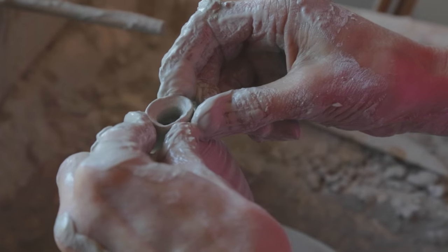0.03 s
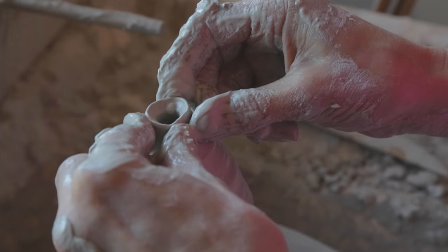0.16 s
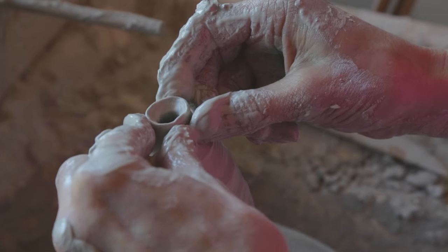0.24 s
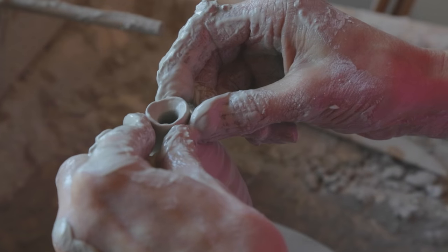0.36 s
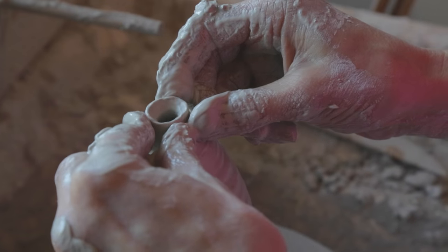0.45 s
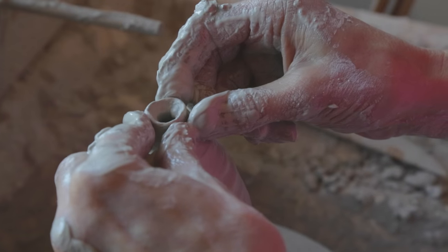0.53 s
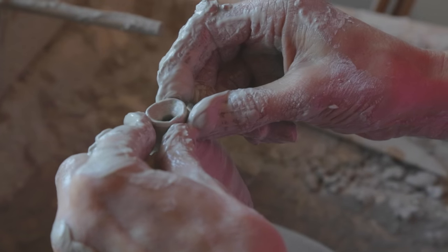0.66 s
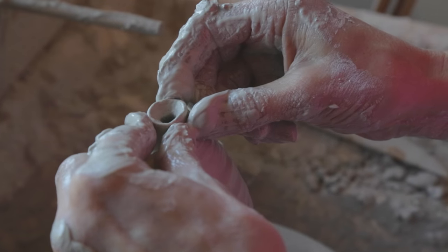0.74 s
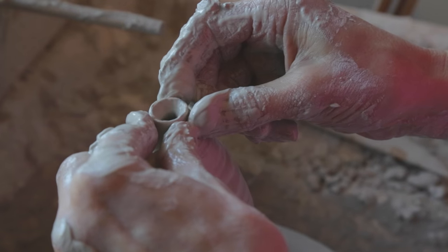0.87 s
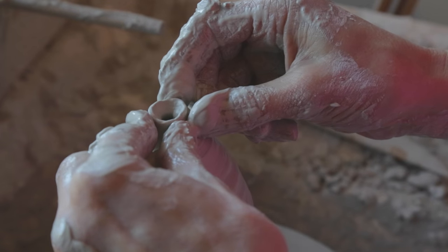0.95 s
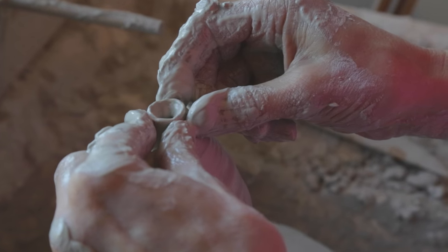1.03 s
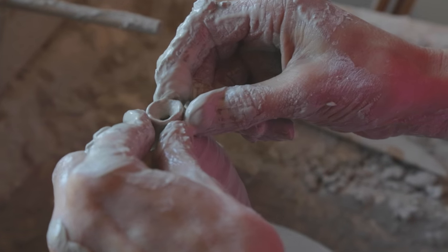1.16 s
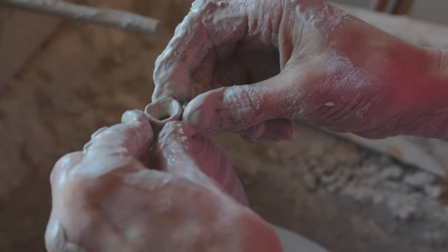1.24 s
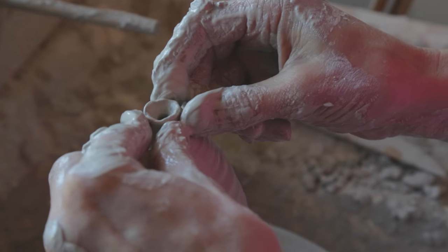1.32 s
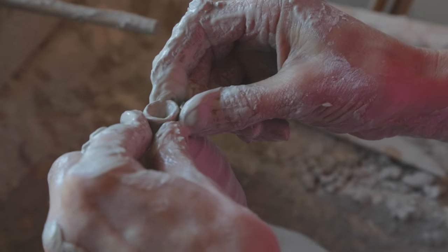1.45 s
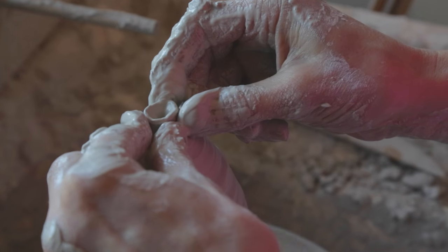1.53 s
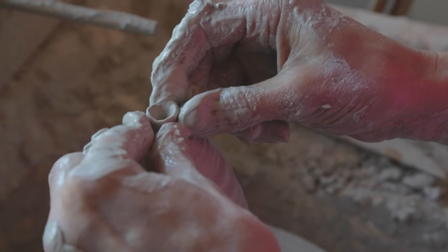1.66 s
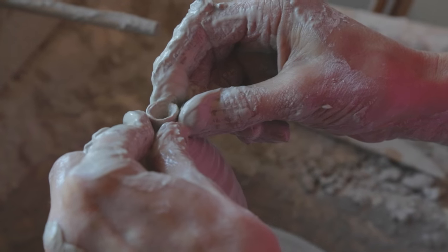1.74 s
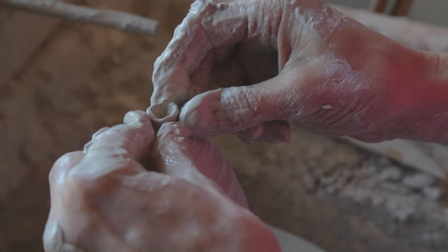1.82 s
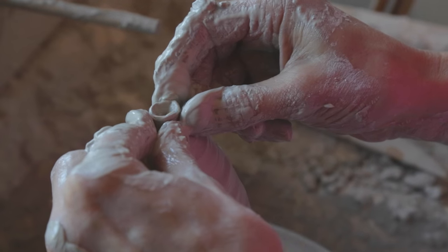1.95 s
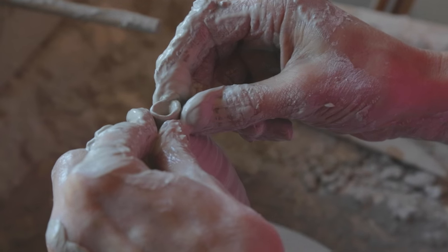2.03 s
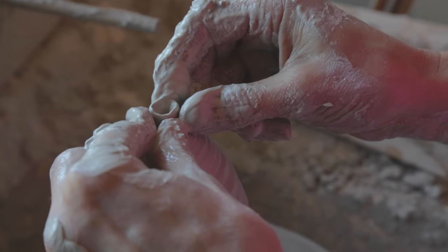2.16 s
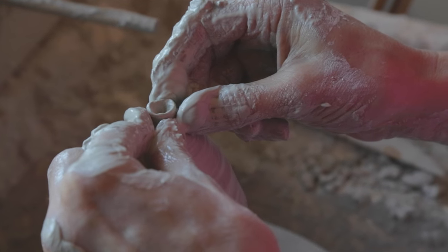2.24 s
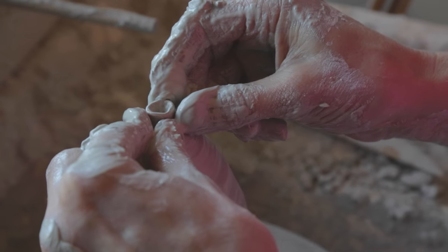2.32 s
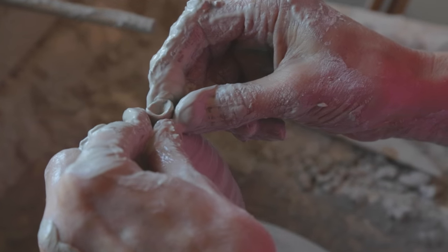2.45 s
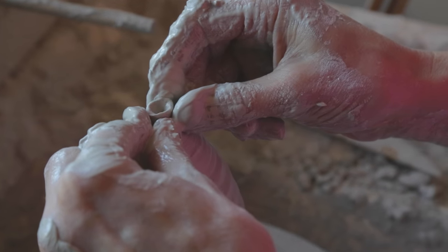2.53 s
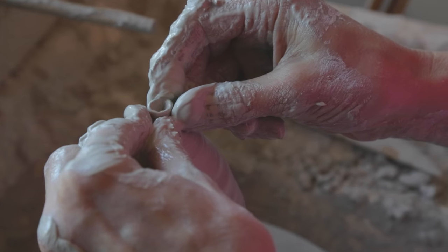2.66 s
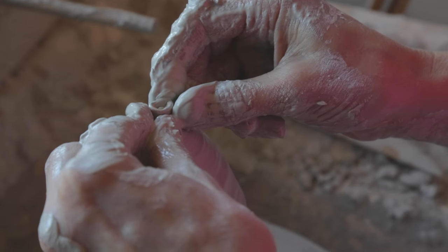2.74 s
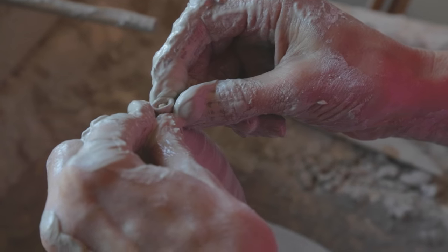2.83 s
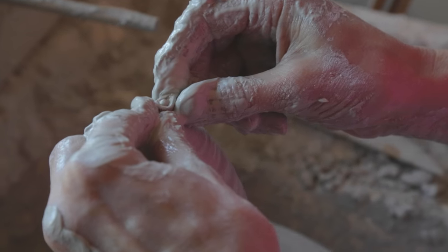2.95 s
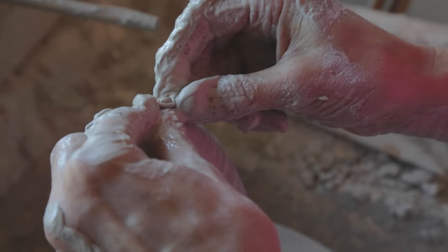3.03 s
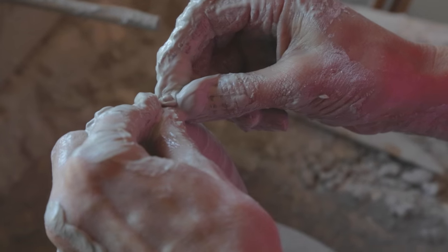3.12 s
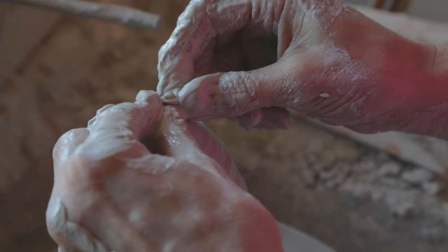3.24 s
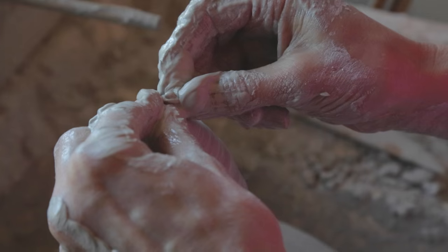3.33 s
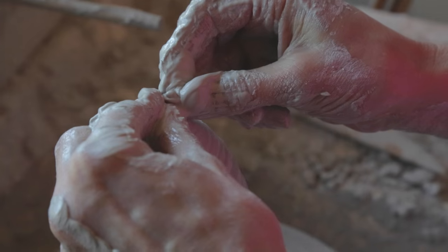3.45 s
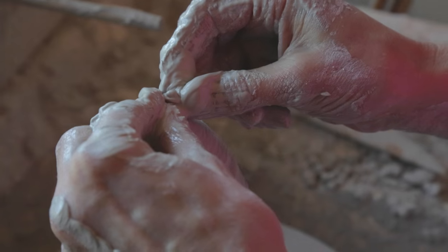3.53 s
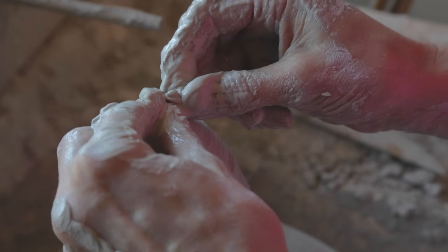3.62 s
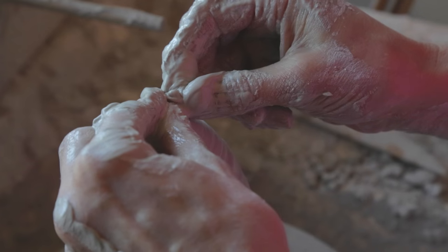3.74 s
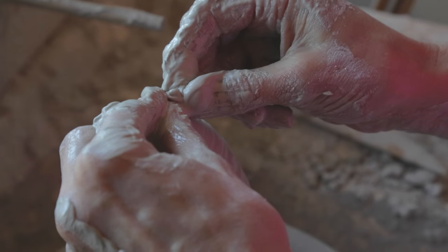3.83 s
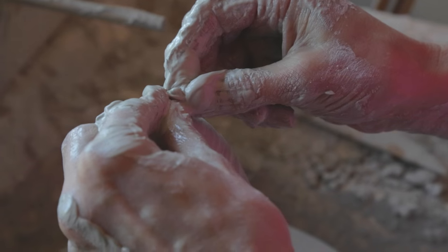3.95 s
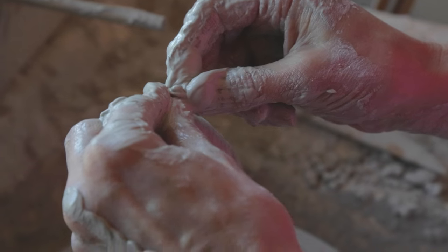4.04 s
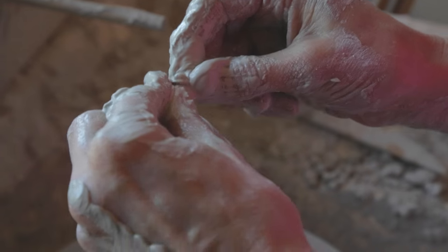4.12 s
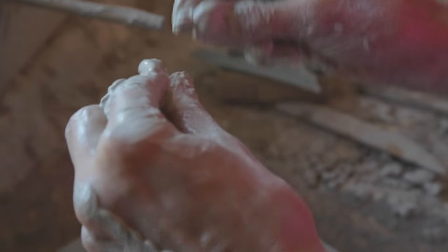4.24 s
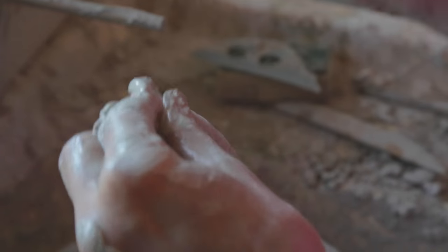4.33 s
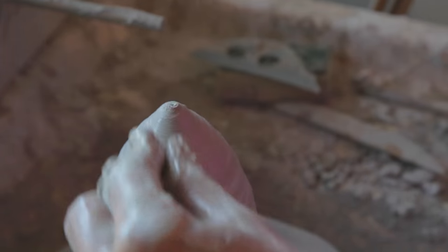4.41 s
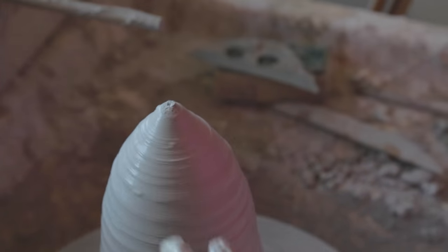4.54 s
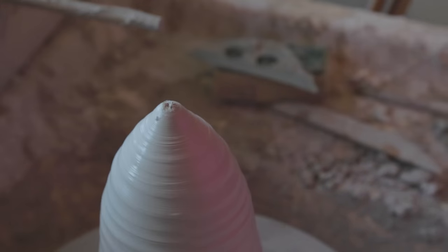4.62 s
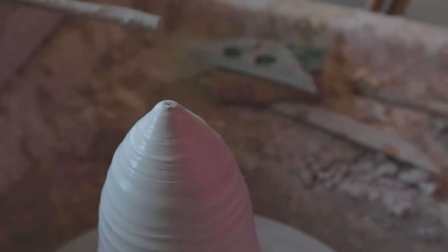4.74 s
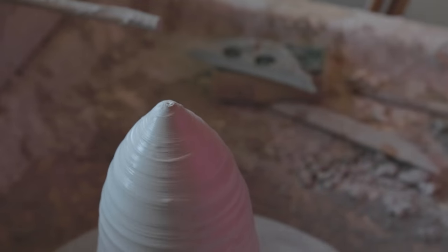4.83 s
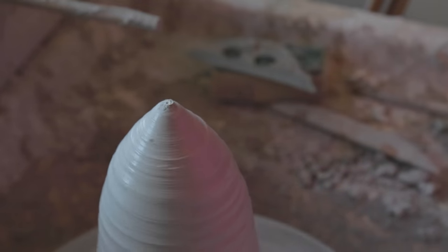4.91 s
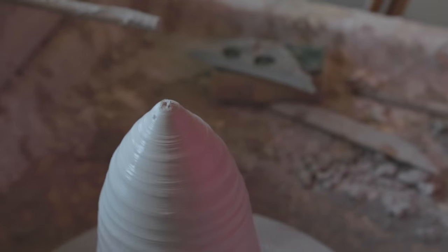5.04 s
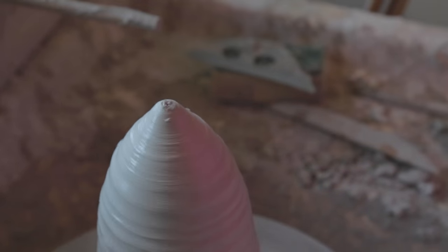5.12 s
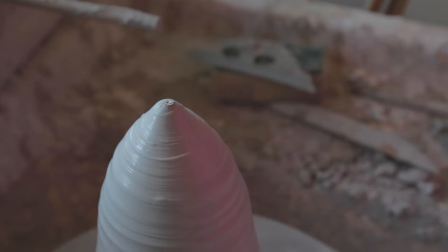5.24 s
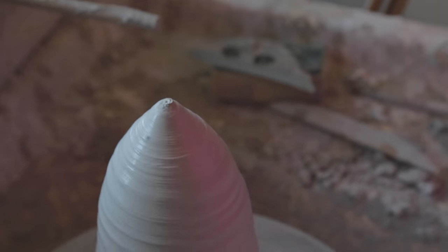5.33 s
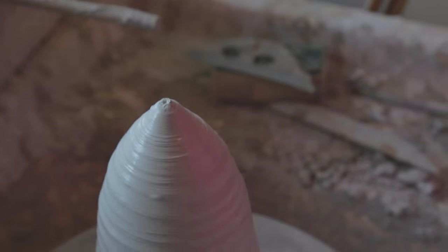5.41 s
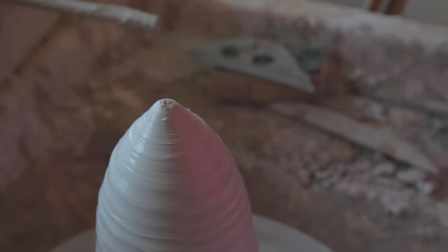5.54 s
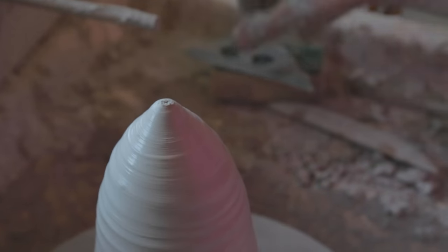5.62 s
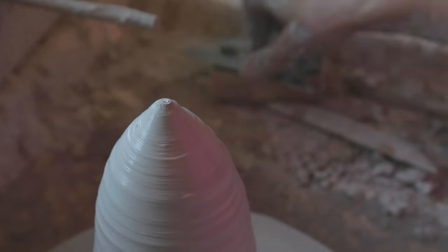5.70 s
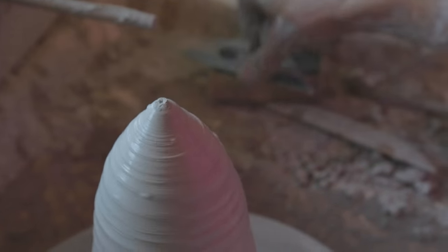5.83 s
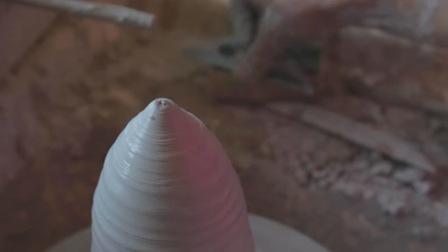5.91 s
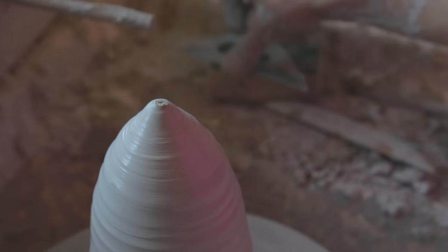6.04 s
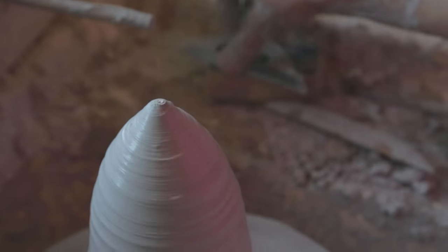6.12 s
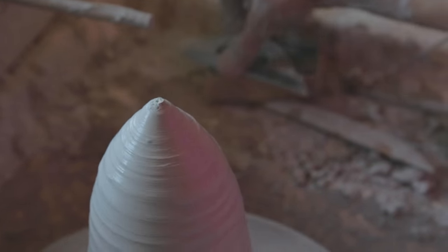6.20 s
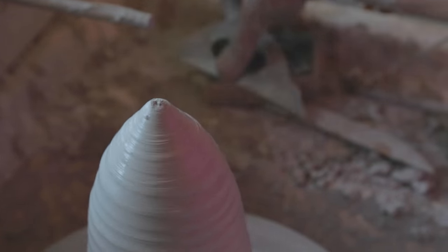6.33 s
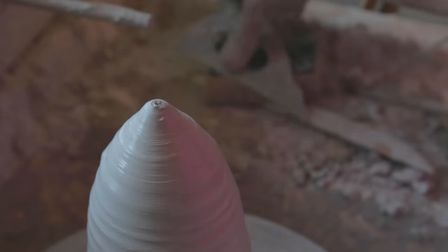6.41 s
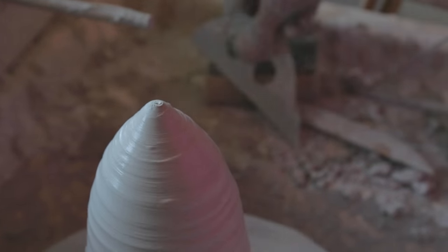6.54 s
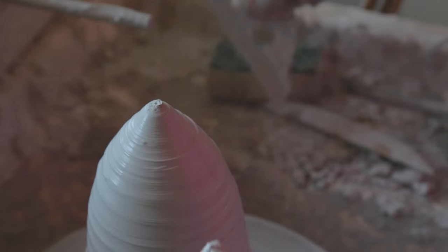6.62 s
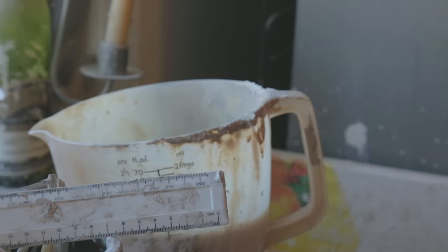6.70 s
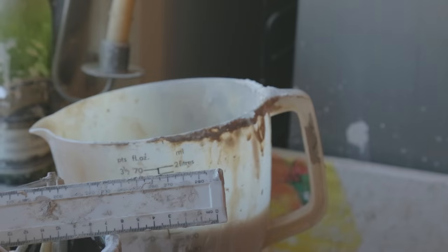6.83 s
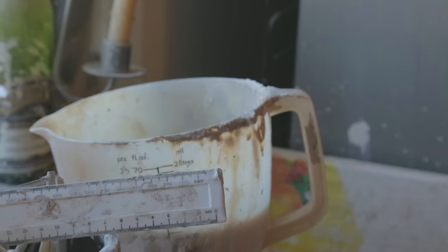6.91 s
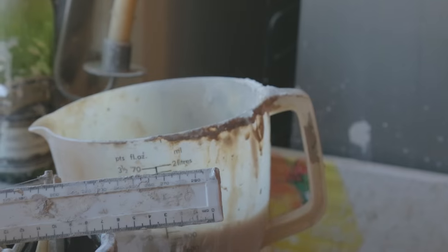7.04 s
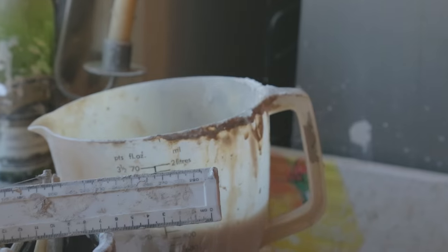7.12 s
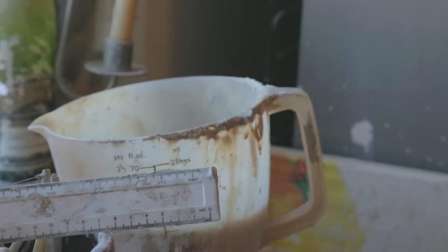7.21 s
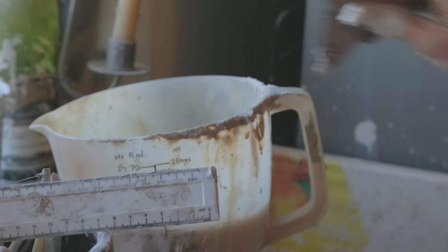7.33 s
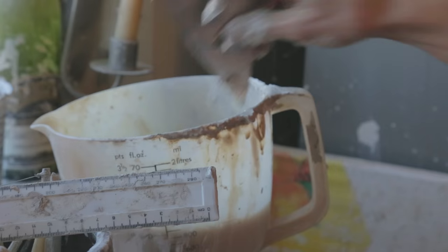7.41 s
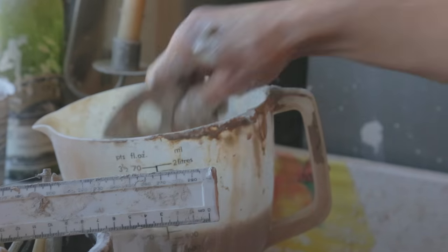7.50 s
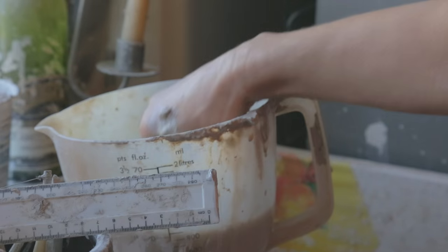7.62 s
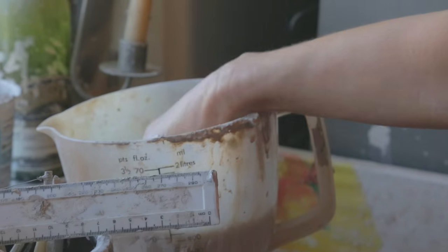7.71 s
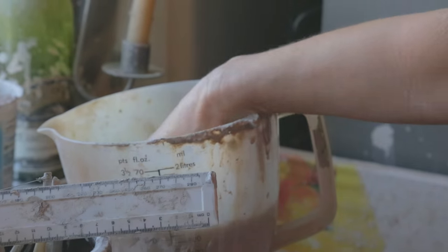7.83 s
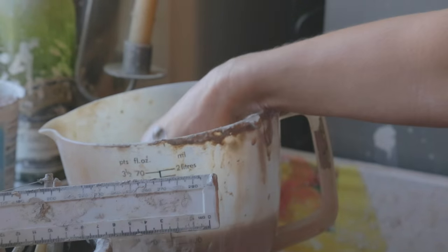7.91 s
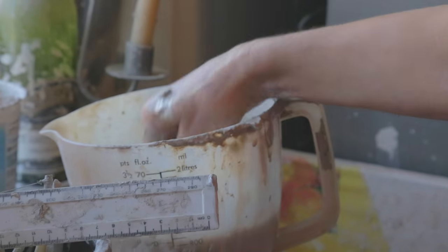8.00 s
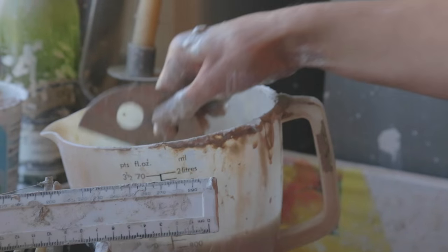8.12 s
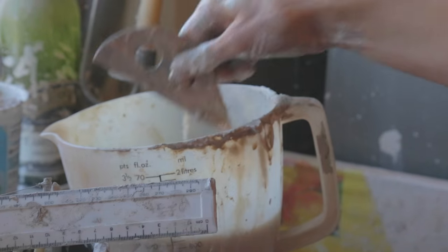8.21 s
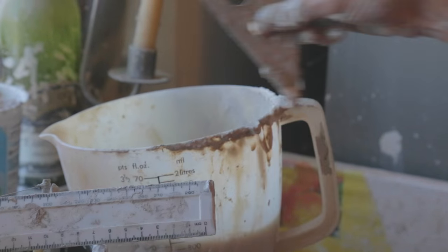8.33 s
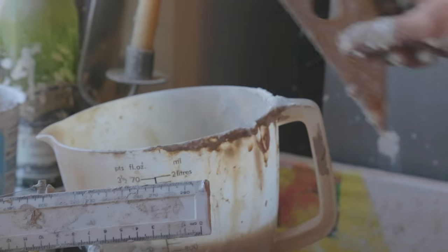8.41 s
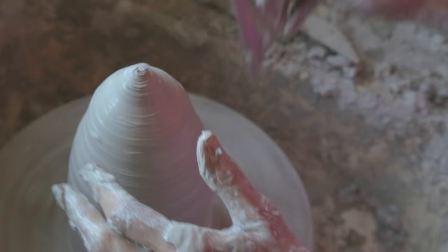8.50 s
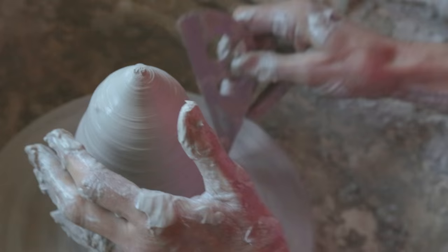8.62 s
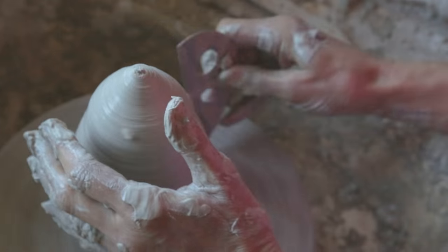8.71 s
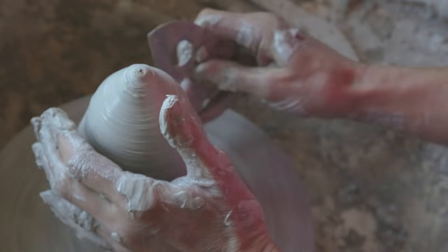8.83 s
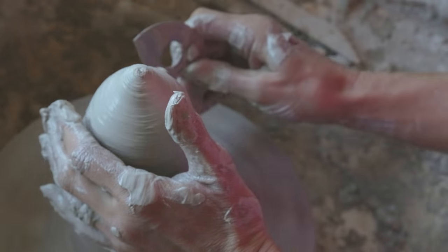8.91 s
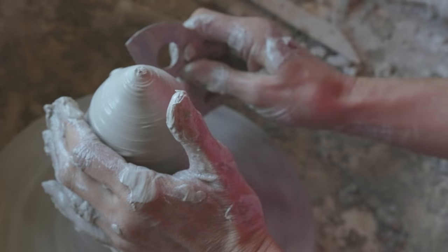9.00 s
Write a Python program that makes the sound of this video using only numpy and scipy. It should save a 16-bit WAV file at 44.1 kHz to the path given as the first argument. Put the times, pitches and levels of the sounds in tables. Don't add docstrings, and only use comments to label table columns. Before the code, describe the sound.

Low, uneven motor rumble and soft wet clay hiss continue throughout while a metal rib is picked up, dipped in a plastic jug and shaken.

```python
import sys
import numpy as np
from scipy import signal
from scipy.io import wavfile

SR = 44100
rng = np.random.default_rng(int(sys.argv[2]) if len(sys.argv) > 2 else 0)


def bounce(signal):
    frames = np.transpose(np.atleast_2d(signal))
    limited = np.clip(frames, -1, 1)
    pcm = np.round(limited * 32767).astype(np.int16)
    wavfile.write(sys.argv[1], SR, pcm)


def nominal_scale(level):
    x = np.asarray(level, float) / 20
    return 10 ** x


N = 399546
SLOW = 40


def rms_one(x):
    return x / np.sqrt(np.mean(x ** 2) + 1e-20)


def peak_one(x):
    return x / np.abs(x).max()


def drift(rate):
    r = np.exp(-2 * np.pi * rate * SLOW / SR)
    settle = 2000
    white = rng.standard_normal(N // SLOW + settle + 2)
    return rms_one(signal.lfilter([1], [1, -2 * r, r * r], white)[settle:])


def spread(slow):
    return np.interp(np.arange(N) / SLOW, np.arange(len(slow)), slow)


def curve(rows):
    return np.interp(np.arange(N) / SR, *np.transpose(rows))


def humps(rows, width_s):
    t = np.arange(N // SLOW + 1) * SLOW / SR
    return spread(sum(db * np.exp(-.5 * ((t - s) / width_s) ** 2) for s, db in rows))


def wobble(rows, turn_hz):
    mark_s, change_s = 3.3, 6.7
    t = np.arange(N) / SR
    swing_db = sum(db * np.cos(2 * np.pi * (k * turn_hz * (t - mark_s) + lead)) for k, db, lead in rows)
    return swing_db * np.where(t < change_s, 1, .3)


def resonate(x, hz, width_hz):
    r = np.exp(-np.pi * width_hz / SR)
    zeros = np.array([1, 0, -1]) * (1 - r * r) / 2
    return signal.lfilter(zeros, [1, -2 * r * np.cos(2 * np.pi * hz / SR), r * r], x)


def resonate_twice(x, hz, width_hz):
    return resonate(resonate(x, hz, width_hz), hz, width_hz)


def bandpass(x, low, high):
    return signal.sosfilt(signal.butter(2, [low, high], "band", fs=SR, output="sos"), x)


def banded_noise(spectrum, patchy_db, rate):
    hz, db = np.transpose(spectrum)
    edges = hz[0] * 2 ** np.arange(0, np.log2(hz[-1] / hz[0]) + .2, 1 / 3)
    white = rng.standard_normal((2, N))
    together = drift(rate)
    out = 0
    for k, (low, high) in enumerate(zip(edges, edges[1:])):
        band_db = np.interp(np.log(low * high) / 2, np.log(hz), db)
        flicker_db = patchy_db * (together + .7 * drift(rate))
        out = out + bandpass(white[k % 2], low, high) * spread(nominal_scale(band_db + flicker_db))
    return rms_one(out)


def nearby(x):
    t = np.arange(SR // 20) / SR
    echoes = rng.standard_normal(len(t)) * nominal_scale(-60 * t / 0.069) * (t > .003)
    echoes = echoes / np.sqrt(np.sum(echoes ** 2))
    return rms_one(x + 0.28 * signal.oaconvolve(x, echoes)[:N])


def add(out, s, sound):
    at = round(s * SR)
    out[at:at + len(sound)] += sound[:N - at]


def struck(modes, luck):
    touch_s = .0005
    t = np.arange(SR // 8) / SR
    rings = sum(nominal_scale(db + 2.2 * chance - 60 * t / t60) * np.sin(2 * np.pi * hz * t)
                for (hz, db, t60), chance in zip(modes, luck))
    return (1 - np.exp(-t / touch_s)) * rings


def rumble(level_db):
    # f/Hz, bandwidth/Hz, level/dB
    cabinet_modes = [(92, 28, -18.5), (122.5, 19, -7.5), (165.7, 18.1, -7.5), (223.3, 37.5, -6),
                     (253.6, 37, -1), (264.9, 20, 1), (303.6, 35, -6.5), (363.4, 46.6, -6),
                     (432.7, 59.4, -12), (495.6, 39.6, -11.5), (553, 35, -16), (677.3, 48, -17.5),
                     (797, 117, -23), (994, 65, -37)]
    # t/s, peak level/dB (not used), jump of the drive/dB
    belt_thumps = [(0.247, -5, 3), (0.345, -7, 2), (0.438, -6, -1), (0.637, -8, 6), (0.742, -9, 1.5),
                   (0.989, -4, 5.5), (1.055, -7, 5), (1.188, -9, 4), (1.316, -4, 5.5), (1.503, -7, 2),
                   (1.725, -10, 7), (1.844, -8, 2), (1.91, -6, 0.5), (2.317, -8, 4.5), (2.615, -7, 2),
                   (2.747, -9, -1), (2.842, -7, 6.5), (3.147, -8, 5.5), (3.498, -5, 3), (3.669, -6, 1.5),
                   (3.842, -5, 5.5), (3.993, -9, 0), (4.226, -6, 4), (4.326, -6, 1.5), (4.413, -8, 3),
                   (4.895, -7, -1), (5.297, -6, -3), (5.369, -6, 0.5), (5.535, -3, 2.5), (5.741, -9, -0.5),
                   (5.844, -6, 3.5), (6.08, -9, 5.5), (6.202, -6, 6), (6.402, -5, 6), (6.556, -7, 1),
                   (6.677, -8, 2), (6.774, -7, -0.5), (6.961, -9, 3), (7.039, -5, 3), (7.204, -8, 4.5),
                   (7.367, -7, 0), (7.46, -10, 4), (7.582, -9, 3), (7.726, -4, 5.5), (8.126, -7, 5),
                   (8.201, -6, 4.5), (8.417, -6, 1), (8.504, -8, 3), (8.736, -8, -2.5), (8.868, -5, 5.5)]
    # t/s, level/dB
    main_swells = [(.36, 4), (.85, -2), (1.34, 3), (2.0, 1), (2.6, -1), (3.3, -0.5), (3.9, -0.5),
                   (4.4, 0.5), (4.85, -2), (5.15, 2), (5.5, -1), (5.97, -2), (6.5, 1), (7.0, -0.5),
                   (7.35, -2), (7.68, 3.5), (8.1, 2), (8.5, 0), (8.9, 0)]
    # t/s, level/dB
    low_swells = [(.7, -2.5), (1.5, 0), (2.1, -4), (2.65, 0.5), (3.15, -4.5), (3.5, 2), (4.6, -2.5),
                  (5.7, 2.5), (6.55, 2.5), (6.8, 6), (7.75, -1.5), (8.3, -3), (8.9, -2.5)]
    # t/s, level/dB
    mid_swells = [(.6, -2), (1.5, 0), (2.2, 0.5), (3.0, 0.5), (3.6, 0.5), (4.26, -1.5), (4.85, -0.5),
                  (5.5, 0), (6.22, -2.5), (7.0, 0), (7.4, -1), (7.92, 4), (8.5, 0.5)]
    swell_s, thump_dies_s = .12, 0.011
    lead_in = SR // 4

    drive = rng.standard_normal((2, N + lead_in))
    drive *= nominal_scale(2.5 * rms_one(resonate(rng.standard_normal(N + lead_in), 35, 128)))
    jumps_db = np.zeros(N)
    for s, _, db in belt_thumps:
        add(jumps_db, s, db * np.exp(-np.arange(SR // 10) / SR / thump_dies_s))
    drive[:, -N:] *= nominal_scale(jumps_db)

    # swell/dB, centre f/Hz, reach/octaves
    swells = [(humps(main_swells, swell_s), 265, 0.13),
              (humps(low_swells, swell_s), 95, .5),
              (humps(mid_swells, swell_s), 427, .4)]
    body = 0
    for k, (hz, width, db) in enumerate(cabinet_modes):
        swell_db = sum(swell * np.exp(-(np.log2(hz / centre) / reach) ** 2) for swell, centre, reach in swells)
        mode = resonate_twice(drive[k % 2], hz, 1.364 * width)[-N:]
        body = body + spread(nominal_scale(db + 1.07 * drift(4.0))) * nominal_scale(swell_db) * mode
    body = signal.sosfilt(signal.butter(4, 75, "high", fs=SR, output="sos"), body)
    return nominal_scale(level_db) * rms_one(body)


def tray_buzz(level_db):
    # f/Hz, level/dB per Hz
    buzz_spectrum = [(560, -20), (950, -7), (1140, -12), (1340, -15), (1460, -4.5), (2090, -8), (2380, -5),
                     (3140, -6), (3840, -9.5), (4580, -18.5), (6000, -15.5), (7800, -53), (13200, -120)]
    # f/Hz, bandwidth/Hz, lift/dB
    tray_modes = [(1333, 170, 8), (2360, 72, 2.5), (3680, 190, 7.5), (3905, 90, 8), (4180, 58, 4.5)]
    buzz = nearby(banded_noise(buzz_spectrum, patchy_db=1.5, rate=17))
    lifts = sum((nominal_scale(db) - 1) * resonate(buzz, hz, width) for hz, width, db in tray_modes)
    return nominal_scale(level_db + 2.5) * rms_one(buzz + lifts)


def motor(gain_db):
    # multiple of the pull, level/dB
    slot_harmonics = [(12, -61), (13, -55.5), (14, -54.5), (15, -63.5), (16, -68.5), (17, -78)]
    # f/Hz, level/dB
    bearing_whistles = [(5674, -72.5), (7047, -72), (9453, -78), (10869, -80), (12355, -90), (13194, -85),
                        (15315, -88)]
    pull_hz = 99.65
    t = np.arange(N) / SR
    whine = sum(spread(nominal_scale(db + 2.0 + 2.6 * drift(2.5))) * np.sin(2 * np.pi * (k * pull_hz * t + rng.random()))
                for k, db in slot_harmonics)
    white = rng.standard_normal(N)
    whistles = sum(nominal_scale(db) * rms_one(resonate_twice(white, hz, 40)) for hz, db in bearing_whistles)
    return nominal_scale(gain_db) * (whine + whistles)


def clay_hiss(level_db):
    # f/Hz, level/dB per Hz
    hiss_spectrum = [(2470, -26.5), (4200, -3.5), (4950, -15), (5490, -3.5), (6980, -4.5), (7570, -5),
                     (9740, -6.5), (13700, -9), (15500, -16)]
    return nominal_scale(level_db + 1.5) * nearby(banded_noise(hiss_spectrum, patchy_db=1.04, rate=15))


def skim():
    # middle t/s, level/dB, half length/s
    rib_touches = [(6.97, -61, .05), (7.15, -70, .2), (7.28, -69, .04), (7.5, -64, .16), (7.69, -59, .04),
                   (8.32, -64, .05), (8.41, -60, .03), (8.5, -66, .1), (8.74, -57, .04), (8.86, -56, .04),
                   (8.975, -59, .035)]
    # f/Hz, bandwidth/Hz, level/dB
    rib_modes = [(7870, 60, 6), (10700, 90, 4), (11300, 400, -4), (12600, 700, -4), (13050, 70, 0),
                 (13650, 120, 0)]
    # t/s, level/dB
    slurry_fizz = [
        (6.7, -75),
        (6.8, -61),
        (7.4, -57),
        (7.75, -57),
        (7.9, -70),
        (8.3, -65),
        (8.6, -62),
        (9.06, -67),
    ]
    white, t = rng.standard_normal(N), np.arange(N) / SR
    rings = rms_one(sum(nominal_scale(db) * resonate(white, hz, width) for hz, width, db in rib_modes))
    touch = sum(nominal_scale(db) * np.clip(1 - ((t - s) / half) ** 2, 0, 1) for s, db, half in rib_touches)
    fizz = rms_one(resonate_twice(white, 5000, 1500))
    return rings * touch + fizz * nominal_scale(np.interp(t, *np.transpose(slurry_fizz), left=-120))


def squeal():
    # t/s, length/s, level/dB, f/Hz, bend in the middle/Hz
    skin_squeals = [
        (7.44, .27, -68, 13400, 580),
        (7.42, .3, -72, 10500, 150),
        (7.02, .12, -74, 10600, 0),
        (7.2, .1, -70, 10550, 0),
        (6.9, .26, -71, 13500, 0),
        (7.08, .18, -72, 12250, 0),
        (8.4, .17, -70, 10150, 0),
        (8.82, .2, -70, 7900, 0),
    ]
    t, out = np.arange(N) / SR, 0
    for s, length, db, hz, bend_hz in skin_squeals:
        arch = np.clip(1 - (2 * (t - s) / length - 1) ** 2, 0, 1)
        pitch = hz + bend_hz * arch + spread(25 * drift(30))
        tone = np.sin(2 * np.pi * np.cumsum(pitch) / SR)
        out = out + spread(nominal_scale(db + 4 * drift(20))) * arch ** .3 * tone
    return out


def blow(db, edge_db, tip_db, splash_db, t60, rise_s, snap):
    # f/Hz, bandwidth/Hz
    part_modes = [
        [(1150, 200), (1300, 65), (1480, 23)],
        [(1880, 95), (2230, 65), (2500, 62), (2780, 62)],
        [(3050, 77), (3380, 96), (3630, 170)],
    ]
    t = np.arange(SR // 7) / SR
    tail = nominal_scale(-60 * t / t60) * (1 - np.exp(-t / rise_s))
    scuff = rng.standard_normal(len(t)) * (tail + snap * nominal_scale(-60 * t / 0.012))
    scuff[0] += 3.7 * snap
    body, edge, tip = [peak_one(sum(resonate(resonate(scuff, hz, 3.0 * width), hz, 3.3 * width)
                                    for hz, width in part)) for part in part_modes]
    splash = peak_one(bandpass(scuff, 4000, 7200))
    mix = body + nominal_scale(edge_db) * edge + nominal_scale(tip_db) * tip + nominal_scale(splash_db + 6.5) * splash
    return nominal_scale(db - 4.5) * mix


def rattles():
    # t/s, body peak level/dB, edge and tip above it/dB
    tool_landings = [(0.949, -36, -8, 6), (1.639, -33.5, 3.5, -14), (2.15, -31, 2, -9), (2.35, -37, -2, 1),
                     (2.98, -43, 9, -7), (3.289, -25, -8, -17), (3.409, -31.5, 0, -1),
                     (3.629, -33, -10, -9), (3.725, -25, -4, -12), (3.79, -33, 0, 0), (4.1, -38, 3, -6),
                     (4.192, -35, -11, 4), (4.66, -33, -3, -1), (4.69, -26.5, -1, -8), (4.72, -31, 2, -5),
                     (4.98, -23, -6, -6), (5.321, -32, 2, -7), (5.472, -32, 3, -10), (5.53, -32, -9, 2),
                     (7.415, -27.5, -1, -3), (7.494, -29, 0, -12), (8.545, -29, -1, -3.5)]
    out = np.zeros(N)
    for s, db, edge_db, tip_db in tool_landings:
        add(out, s, blow(db, edge_db, tip_db, -54 - db, t60=0.13, rise_s=0.0027, snap=.3))
    return out


def handling():
    # edge/dB, tip/dB, splash/dB
    rib_blows = [(6.564, -33, -10, 1, -13), (6.611, -21, -3, -8, -14.5), (6.614, -19, -8, -7, -22),
                 (6.622, -40.5, 2, 4, 1.5), (6.630, -37, 2, 0, 0), (6.639, -42, 0, 10, -6),
                 (6.718, -32, -2, -2, -20), (6.744, -39, -2, -9, -18), (7.698, -43, 0, -6, 2),
                 (7.730, -20.5, -6, -16, -27), (7.8330, -12.5, 0, -5, -27), (7.856, -21, -6, -7, -12),
                 (8.066, -33, 2, 2, -8), (8.077, -38, 4, 6, -10), (8.090, -39, 4, 6, -11),
                 (8.106, -32.5, 2, 3, -6), (8.119, -37, 3, 2, -9), (8.135, -40, 2, 2, -11),
                 (8.149, -39, 0, 5, -10), (8.204, -38, 10, -10, -14), (8.4022, -33, -1, -6, -20),
                 (8.414, -32, 0, 2, -13), (8.775, -37, -5, 6, -4)]
    hard_db, longer_s_per_db = -19.5, 0.02
    out = np.zeros(N)
    for s, db, edge_db, tip_db, splash_db in rib_blows:
        t60 = 0.078 + longer_s_per_db * max(db - hard_db, 0)
        add(out, s, blow(db, edge_db, tip_db, splash_db, t60, rise_s=.0002, snap=2.5))
    return out


def jug():
    # t/s, peak level/dB
    wall_knocks = [
        (7.834, -2),
        (7.857, -22),
        (6.6115, -23),
        (8.067, -24),
    ]
    # f/Hz, level/dB, T60/s
    jug_modes = [(620, -19, 0.05), (808, -5.5, 0.13), (836, -6.5, 0.12), (1200, -13, 0.06),
                 (1445, -4, 0.075)]
    out = np.zeros(N)
    for s, db in wall_knocks:
        add(out, s, nominal_scale(db - 1.5) * struck(jug_modes, rng.standard_normal(len(jug_modes))))
    return bandpass(out, 400, 2500)


def grit():
    # t/s, peak level/dB, f/Hz
    grit_ticks = [(0.1657, -42, 6400), (0.2874, -47, 6340), (0.4286, -50, 6000), (0.5328, -46, 5870),
                  (0.6047, -53, 6300), (0.7449, -46, 6200), (1.0836, -46, 6290), (1.6493, -47, 6270),
                  (2.0958, -49, 5870), (2.686, -45, 6210), (3.6213, -43, 6280), (3.8069, -46, 5750),
                  (4.1945, -40, 6190), (4.3636, -49, 6300), (4.9343, -44, 6290), (5.1199, -45, 5700),
                  (6.1596, -44, 6290), (6.3621, -46, 6270)]
    out = np.zeros(N)
    for s, db, hz in grit_ticks:
        add(out, s, struck([(hz, db + 5.0, .015)], [0]))
    return out


def rib_rings():
    # t/s, level/dB, f/Hz, T60/s
    rib_tinks = [(6.611, -28, 5300, .008), (6.1, -32, 1210, 0.02), (6.6118, -24, 3110, 0.026),
                 (6.612, -19, 1330, .03), (6.6122, -23, 950, .025), (6.6118, -28, 1750, .02),
                 (6.6122, -28, 2600, .015), (6.616, -27, 3300, .02), (6.655, -38, 3500, .06),
                 (6.6125, -31, 2190, .05), (6.619, -29, 3750, .025), (6.624, -29, 2180, 0.043),
                 (6.624, -30, 2800, 0.035), (6.6385, -36, 3900, .03), (6.7185, -22, 3490, 0.017),
                 (6.7235, -28, 3450, 0.027), (6.7235, -30, 1250, .03), (6.7245, -33, 2300, .025),
                 (6.719, -32, 2650, .03), (6.7186, -26.5, 1270, .04), (6.762, -38, 2970, .05),
                 (7.839, -16, 1990, 0.03), (7.834, -24, 2750, .03), (7.835, -28, 2300, 0.03),
                  (7.835, -22, 3630, 0.035), (7.834, -27, 3200, .025), (7.848, -32, 2700, .04),
                  (7.8425, -19, 1120, .035), (7.842, -19, 380, .05), (7.8365, -20, 1700, .04),
                  (7.862, -23, 1450, .05), (7.878, -30, 1900, .04), (8.066, -23, 3350, .016),
                  (8.0665, -26, 2250, .025), (8.066, -39, 5700, .03), (8.078, -33, 3650, .05),
                  (8.087, -34, 2850, .04), (8.106, -29.5, 3620, .04), (8.107, -28, 2190, .04),
                  (8.106, -30, 1500, .04), (8.131, -35, 2800, .03), (8.149, -37, 3450, .03),
                  (8.4031, -14, 1400, 0.012), (8.4032, -13, 1950, 0.008), (8.4032, -16, 2500, 0.01),
                  (8.4033, -27, 3100, .01), (8.4085, -30, 2000, .025), (8.412, -21, 1450, .018),
                  (8.427, -37, 2300, .08), (8.4045, -38, 5500, .015), (8.409, -25, 1360, .03),
                  (8.414, -31, 3550, .03), (8.418, -33, 2280, .12), (8.417, -31, 1570, .07),
                  (8.423, -37, 3700, .04), (8.776, -33, 2550, 0.04), (8.776, -38, 4800, .04),
                  (8.789, -41, 4950, .05)]
    out = np.zeros(N)
    for s, db, hz, t60 in rib_tinks:
        add(out, s, struck([(hz, db - 1.5, t60)], [0]))
    return out


def spray():
    # t/s, level/dB, T60/s, centre f/Hz, bandwidth/Hz
    spray_bursts = [
        (0.89, -49, .9, 3600, 1200),
        (6.611, -46, .1, 10000, 9000),
        (6.62, -46, .15, 4800, 2500),
        (7.35, -45, .5, 1800, 700),
        (7.833, -44, .3, 4500, 2500),
        (8.066, -47, 0.29, 4800, 3500),
        (8.106, -50, .3, 4800, 3500),
        (8.066, -39.5, 0.4, 2800, 2200),
        (8.403, -44, .18, 4300, 3000),
    ]
    out, t = np.zeros(N), np.arange(SR // 4) / SR
    for s, db, t60, hz, width in spray_bursts:
        hiss = rms_one(resonate(resonate(rng.standard_normal(len(t)), hz, width), hz, 1.4 * width))
        add(out, s, hiss * nominal_scale(db - 60 * t / t60))
    return out


def studio(x):
    t = np.arange(SR // 3) / SR
    tail = resonate(rng.standard_normal(len(t)), 1500, 4900) * nominal_scale(-60 * t / 0.14) * (t > .004)
    return signal.oaconvolve(x, tail / np.sqrt(np.sum(tail ** 2)))[:N]


def scene():
    # t/s, level/dB
    drive_load = [(0.0, -14), (.9, -14.5), (1.3, -16), (2.0, -13.5), (3.2, -15.5), (3.8, -15), (4.4, -15),
                  (5.0, -13.5), (5.9, -15), (6.4, -16.5), (7.0, -14.5), (7.9, -16.5), (9.06, -14.5)]
    # t/s, level/dB
    clay_wetness = [(0.0, -57), (.4, -55.5), (1.4, -58), (1.9, -55.5), (2.8, -55.5), (3.1, -58),
                    (4.5, -56.5), (5.8, -55.5), (6.5, -58), (7.0, -56.5), (7.7, -56), (8.3, -57.5),
                    (9.06, -55.5)]
    # t/s, level/dB
    gain_rides = [(.17, 2.5), (.385, -6), (.54, 3.5), (.69, -3.5), (.97, 4), (1.15, -0.5), (1.38, -3),
                  (1.87, 1), (2.14, 0.5), (2.33, 1.5), (2.73, 0.5), (3.11, -2.5), (3.76, 2), (4.05, -3),
                  (4.21, 1), (4.48, -3), (4.69, 0.5), (4.79, -3), (4.94, 3), (5.18, -3), (5.32, 0),
                  (5.8, 3.5), (6.48, 1), (5.97, 1.8), (7.72, 0), (7.95, -3), (8.11, -2), (8.27, -2),
                  (8.49, -3.5), (8.68, -1.5)]
    # t/s, level/dB
    belt_grips = [(.08, -1.5), (.28, 1), (.61, -2), (1.24, 2), (1.64, 3.5), (1.72, -4.5), (1.97, 1.5),
                  (3.4, -0.5), (3.85, -0.5), (4.36, 0.5), (4.8, -1.5), (5.1, 3), (5.24, -5.5), (5.33, 3),
                  (5.62, -3), (5.71, -3.5), (6.0, 1.5), (6.4, 1), (6.75, -2.5), (7.1, 4), (7.21, -3),
                  (7.6, 0), (7.74, 0.5), (7.895, 5.5), (8.43, 3.5), (8.81, -5), (8.89, 0.5), (9.02, 4.5)]
    # times per turn, swing/dB, lead/cycles
    head_unevenness = [(1, 0.9, .17), (2, 1, 0.52), (3, 0.3, .2)]
    belt_unevenness = [(1, 0.55, -0.25), (2, 0.48, .29)]
    load_db, wet_db = curve(drive_load), curve(clay_wetness)
    ride_db, grip_db = humps(gain_rides, 0.047), humps(belt_grips, 0.027)
    head_db, belt_db = wobble(head_unevenness, 2.356), wobble(belt_unevenness, 2.385)

    tray_db = -48 + 0.44 * (load_db - load_db.mean()) + .4 * (wet_db - wet_db.mean())
    tray_db = tray_db + 0.82 * ride_db + .3 * grip_db + .9 * belt_db
    wheel = rumble(load_db + 0.94 * ride_db + grip_db + belt_db)
    wheel = wheel + tray_buzz(tray_db) + motor(tray_db - np.mean(tray_db))
    clay = clay_hiss(wet_db + 0.9 * ride_db + head_db) + skim() + squeal()
    hits = rattles() + handling() + jug() + grit() + rib_rings()
    return (wheel + clay + hits + nominal_scale(-13.0) * studio(hits) + spray())[None]


def top_cut(x):
    return signal.sosfilt(signal.butter(12, 15640, fs=SR, output="sos"), x)


def record(dry):
    # t/s, level/dB, time of a 60 dB fall/s
    thump_steps = [
        (0.0, -11, .004),
        (8.5788, -19, .016),
    ]
    over_db = np.maximum(20 * np.log10(np.abs(dry[0]) + 1e-9) + 9, 0)
    fall_db = 65 * np.arange(N) / SR
    held_db = np.maximum.accumulate(over_db + fall_db) - fall_db
    x = dry[0] * nominal_scale(-.55 * signal.lfilter([.05], [1, -.95], held_db))
    x = x + nominal_scale(-65) * spread(drift(35)) + nominal_scale(-66.5) * rng.standard_normal(N)
    for s, db, t60 in thump_steps:
        add(x, s, nominal_scale(db - 60 * np.arange(SR // 10) / SR / t60))
    return top_cut(x[None])


dry = scene()
out = record(dry)
bounce(out)
```